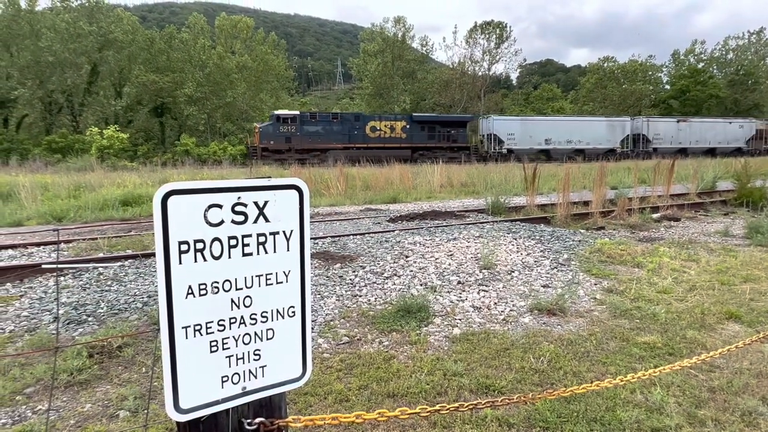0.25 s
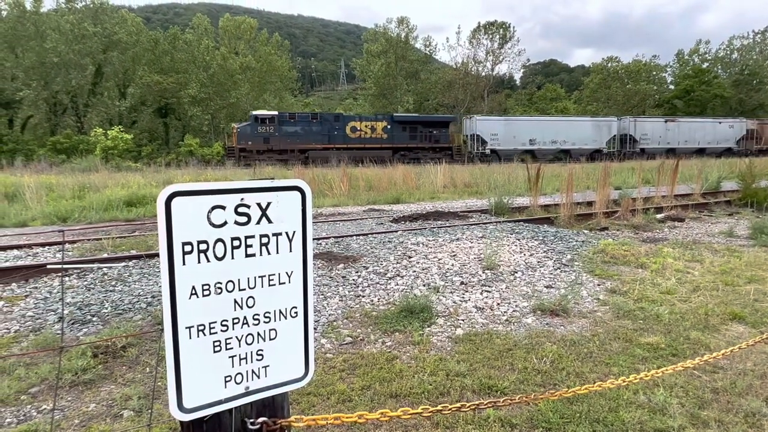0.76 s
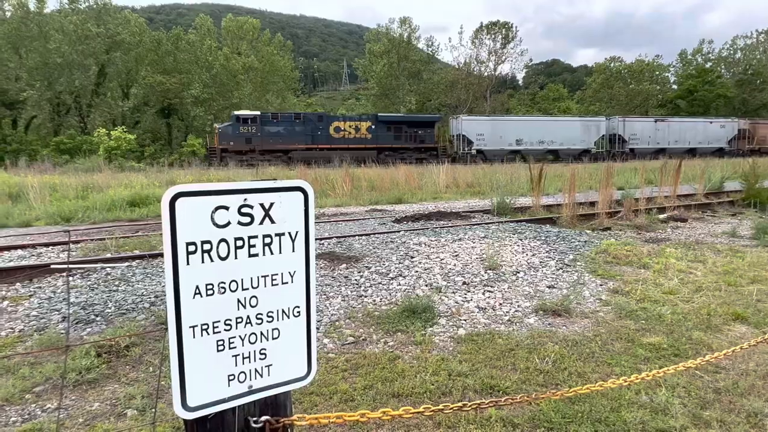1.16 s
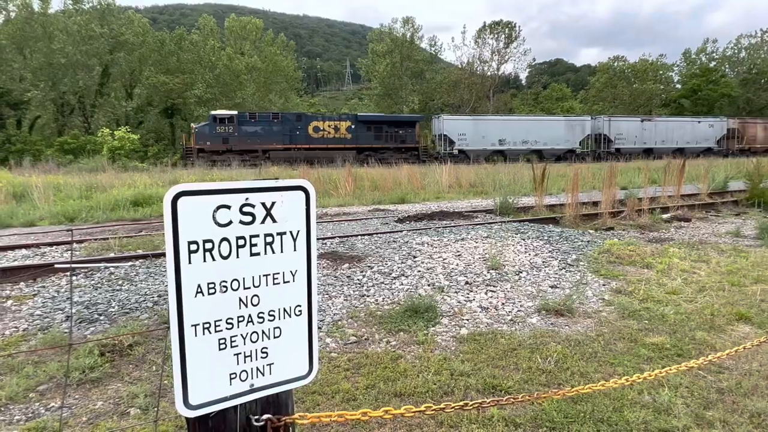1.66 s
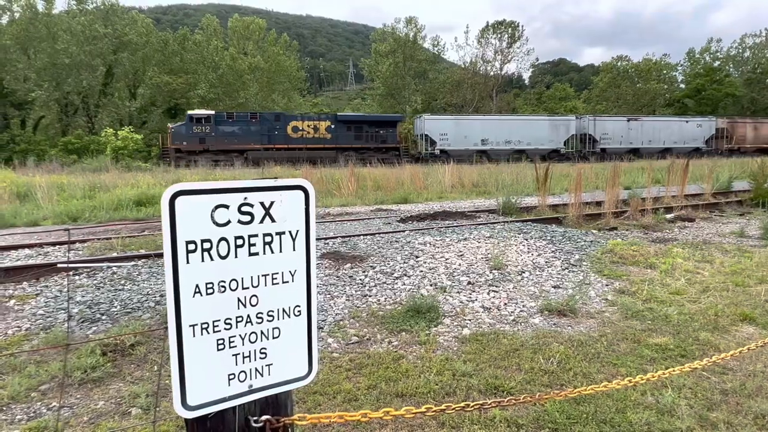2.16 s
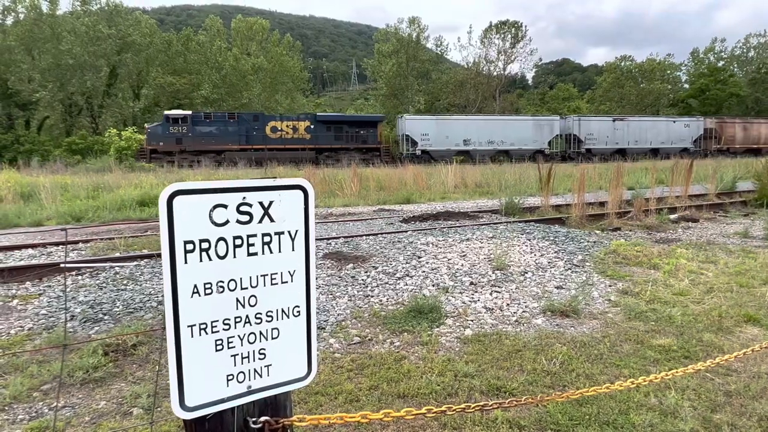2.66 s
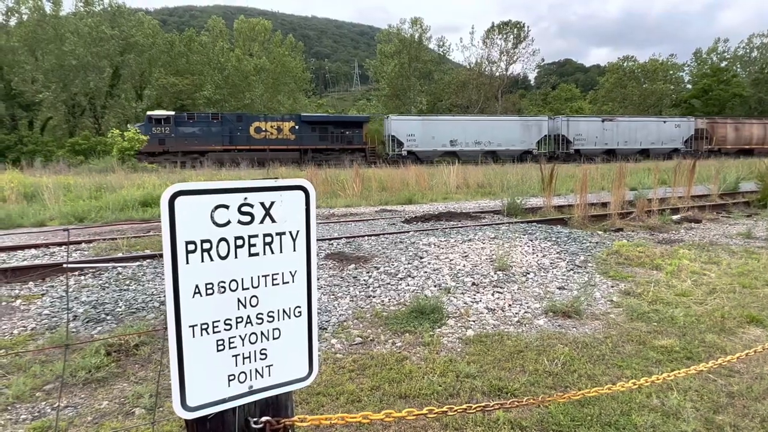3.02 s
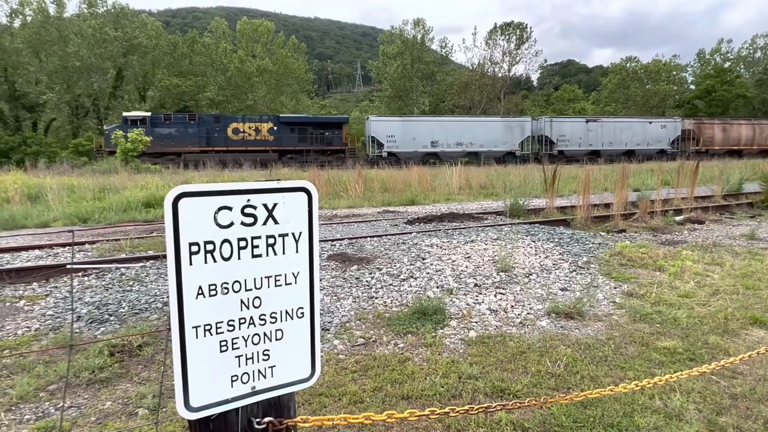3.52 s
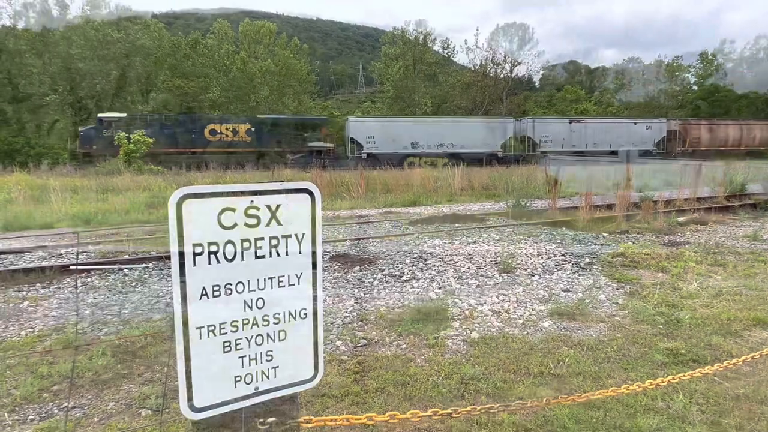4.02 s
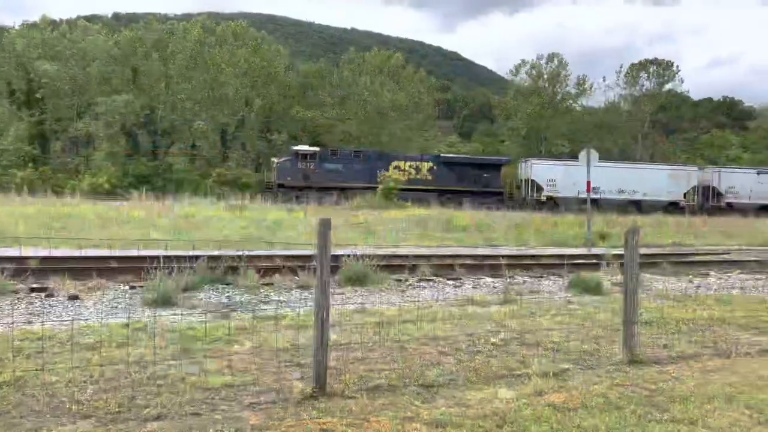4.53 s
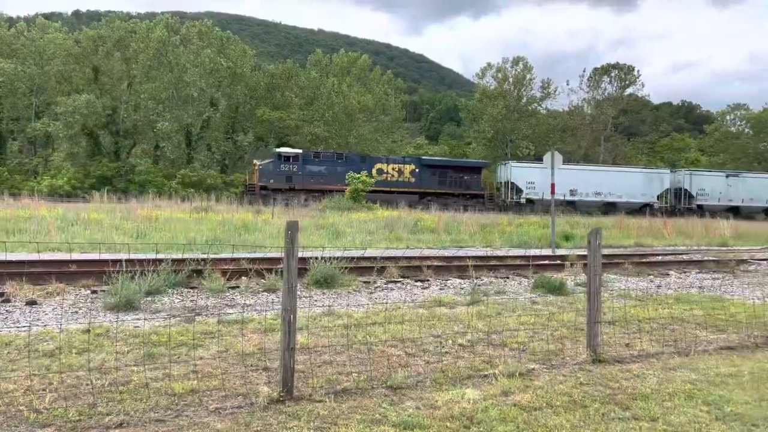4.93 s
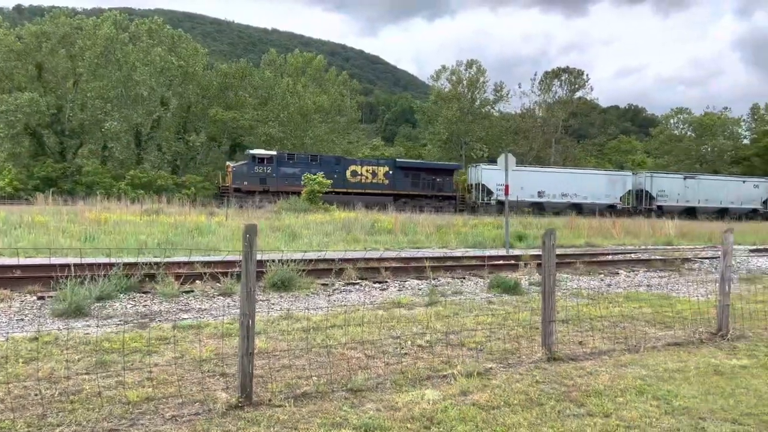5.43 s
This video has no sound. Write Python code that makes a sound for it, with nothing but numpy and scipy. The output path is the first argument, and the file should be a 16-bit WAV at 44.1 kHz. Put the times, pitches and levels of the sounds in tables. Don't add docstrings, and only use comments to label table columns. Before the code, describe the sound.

A freight locomotive's heavy diesel throb and turbo whine ease off across a field, then blend into a slower chug with rolling wagons and flange squeals.

```python
import sys
import numpy as np
from scipy import signal
from scipy.fft import rfft, irfft, next_fast_len
from scipy.io import wavfile
from scipy.ndimage import uniform_filter1d, map_coordinates

SR = 44100
rng = np.random.default_rng(int(sys.argv[2]) if len(sys.argv) > 2 else 0)


def boost_factor(decibels):
    exponent = np.asarray(decibels, float) / 20
    return 10 ** exponent


def dump_mix(stems):
    frames = np.atleast_2d(stems).T
    limited = np.clip(frames, -1, 1)
    pcm = np.round(limited * 32767).astype(np.int16)
    wavfile.write(sys.argv[1], SR, pcm)


N = 250488
GUST_DB_PER_S = 92.5


def unit(x):
    return x / np.sqrt(np.mean(x ** 2) + 1e-20)


def along(points, hz):
    f, v = np.transpose(points)
    return np.interp(np.log(hz + 1), np.log(f + 1), v)


def curves(rows):
    s, *cols = np.transpose(rows)
    return [np.interp(np.arange(N) / SR, s, c) for c in cols]


def wobble(rate):
    knots = rng.standard_normal(int(N * rate / SR) + 4)
    return map_coordinates(knots, [np.arange(N) * rate / SR])


def swells(rows, db_per_s):
    t = np.arange(N) / SR
    events = []
    for start, hold, db in rows:
        outside = np.maximum(np.maximum(start - t, t - start - hold), 0)
        events.append(db - db_per_s * outside)
    return np.max(events, axis=0)


def filtered(x, response):
    m = next_fast_len(N + 8192)
    return irfft(rfft(x, m) * response(np.fft.rfftfreq(m, 1 / SR)), m)[..., :N]


def resonance(f, hz, width):
    return f * width / np.abs(hz * hz - f * f + 1j * f * width)


def tone(turns, db, rough):
    return np.sqrt(2) * boost_factor(db) * np.cos(2 * np.pi * turns + rough)


def rush(spectrum, alike, lean, patchy_db):
    z = signal.stft(rng.standard_normal((2, N)), nperseg=512)[2]
    field = uniform_filter1d(rng.standard_normal(z.shape[1:]), size=5, axis=0)
    field = uniform_filter1d(field, size=16, axis=1)
    pair = signal.istft(z * boost_factor(patchy_db * unit(field)), nperseg=512)[1][:, :N]

    def mid_and_side(hz):
        turn = np.arccos(np.clip(along(alike, hz), -.97, 1)) / 2
        return boost_factor(along(spectrum, hz)) * [np.ones_like(hz), np.tan(turn)]

    mid, side = filtered(pair, mid_and_side)
    left_right = np.array([mid + side, mid - side])
    both = filtered(left_right, lambda hz: boost_factor(np.outer([.5, -.5], along(lean, hz))))
    return both / np.std(both.mean(0))


def placed(x, lean_db, lead_s):
    def response(hz):
        lead = hz * np.exp(-(hz / 6500) ** 4)
        return boost_factor([[lean_db / 2], [-lean_db / 2]]) * np.exp(1j * np.pi * np.outer([lead_s, -lead_s], lead))
    return filtered(x, response)


# pitch_hz, level_db (per Hz)
SELF_NOISE = [(10900, -120), (11050, -9), (11500, -6), (11800, -2), (13200, 0), (14100, -4), (14600, -13),
              (15100, -16)]
# pitch_hz, level_db (per Hz)
PORT_HISS = [(8600, -120), (9000, -3.5), (10300, 0), (11500, -3), (12100, -7), (12300, -120)]
AIR_DB = [-67.5, -73.5]


def microphone_air(share, loss_db):
    air_db = (1 - share) * (AIR_DB[0] + 1.2 * loss_db) + share * AIR_DB[1]
    alike = [(11300, -.2), (11900, .5), (12300, .9)]
    common = boost_factor(air_db) * rush(SELF_NOISE, alike, [(60, 0)], patchy_db=2)
    port = unit(filtered(rng.standard_normal(N), lambda f: boost_factor(along(PORT_HISS, f))))
    return common + boost_factor(air_db + 6) * [[1], [-1]] * port


# peak_s, length_s, pitch_hz, level_db
BURSTS = [(1.85, .03, 13000, -59), (3.268, .006, 5800, -46), (3.87, .015, 8500, -58), (1.65, .02, 9000, -60),
          (1.8, .015, 9100, -60), (1.87, .02, 11400, -66), (.9, .02, 10900, -72), (4.49, .02, 11800, -70),
          (4.95, .06, 9200, -70), (4.4, .06, 9100, -71), (5.4, .015, 9300, -68), (3.131, .003, 700, -34),
          (3.55, .03, 2720, -53), (5.49, .015, 12000, -64), (5.49, .012, 8600, -61), (5.02, .04, 4400, -57)]


def bursts():
    t, out = np.arange(N) / SR, np.zeros(N)
    for start, length, hz, db in BURSTS:
        band = filtered(rng.standard_normal(N), lambda f: np.exp(-((f - hz) / (0.066 * hz)) ** 2))
        out += boost_factor(db) * np.exp(-((t - start) / length) ** 2) * unit(band)
    return out


# start_s, hold_s, level_db
VALVE = [
    (.45, .3, -65.5),
    (.95, .35, -65),
    (1.5, .2, -65),
]


def valve():
    band = filtered(rng.standard_normal(N), lambda f: np.exp(-((f - 8170) / 90) ** 2))
    return boost_factor(swells(VALVE, GUST_DB_PER_S / 2)) * unit(band)


# pitch_hz, width_hz, level_db
INTAKE = [(2955, 64, -54.5), (3424, 110, -53.5)]


def intake(loss_db):
    out = np.zeros(N)
    for hz, width, db in INTAKE:
        band = filtered(rng.standard_normal(N), lambda f: resonance(f, hz, width) ** 2)
        out += boost_factor(db + 0.6 * loss_db + 2.9 * wobble(5.5)) * unit(band)
    return out


# pitch_hz, width_hz, level_db
HOOD = [(612, 14, -1), (653.7, 34, 1), (746, 34, 1.6), (877, 40, -2.5)]


def roar(turns, levels_db, rumble, body, hiss, alike, lean, chug_db, knock_db):
    rumble_db, body_db, hiss_db, hood_db = levels_db
    firing = np.cos(2 * np.pi * 3 * turns) + .9 * np.cos(2 * np.pi * 6 * turns)
    chug = chug_db * np.cos(2 * np.pi * turns)

    low = rush(rumble, alike, lean, patchy_db=0.43)
    deep = filtered(low, lambda f: 1 / (1 + (f / 120) ** 6))
    low = boost_factor(rumble_db) * (low + (boost_factor(chug) - 1) * deep)

    swell_db = .35
    middle = rush(body, alike, lean, patchy_db=0.5)
    middle = middle * boost_factor(body_db + 0.18 * firing + 0.1 * chug + swell_db * wobble(4.82))

    def panels(f):
        return sum(boost_factor(db) * resonance(f, hz, width) for hz, width, db in HOOD) ** 2

    hood = unit(filtered(rush([(20, 0), (20000, 0)], alike, lean, patchy_db=0.0), panels))
    hood = hood * boost_factor(hood_db + 0.53 * firing + 1.1 * wobble(15))
    lower_panels = filtered(hood, lambda f: f < 700)
    hood = hood + (boost_factor(knock_db) - 1) * lower_panels

    high = rush(hiss, alike, lean, patchy_db=1.18)
    high = high * boost_factor(hiss_db + 0.42 * firing + swell_db * wobble(5.4))
    return low + middle + hood + high


# start_s, hold_s, level_db
RING_LOW = [(.6, .4, -43), (1.55, .4, -41), (2.25, .45, -45)]
RING_HIGH = [(.1, .4, -46), (.85, .45, -42), (1.55, .2, -45), (3.1, .5, -52)]


def panel_ring(knock_db):
    t, out = np.arange(N) / SR, np.zeros(N)
    for (hz, _, _), rows in zip(HOOD, (RING_LOW, RING_HIGH)):
        db = swells(rows, 43) + 1.6 * knock_db + 1.5 * wobble(8)
        out += tone(hz * t, db, 1.2 * wobble(16))
    return out


# throttle_state, pitch_hz, width_hz, level_db
STACK = [(0, 331, 44.5, -41), (1, 272, 30, -48), (2, 265, 25, -39.5)]


def stack(state):
    out = np.zeros(N)
    for k, (_, hz, width, db) in enumerate(STACK):
        band = filtered(rng.standard_normal(N), lambda f: resonance(f, hz, width) ** 2)
        nearness = np.clip(1 - np.abs(state - k), 0, 1)
        out += boost_factor(db + 1.34 * wobble(2.6)) * nearness * unit(band)
    return out


# time_s, blade_hz
TURBO = [(0, 3520), (.3, 3460), (.6, 3412), (1.15, 3340), (1.5, 3285), (2.1, 3082), (2.5, 2928),
         (3.3, 2545), (4.1, 2495), (5.68, 2450)]
# start_s, hold_s, level_db
BLADE_HEARD = [(0, 0.17, -47), (.3, 0.32, -46.5), (.73, .03, -48), (.9, .02, -47), (1.0, .1, -51),
               (1.15, 0.19, -46), (1.4, .02, -47), (1.58, .04, -50), (1.75, .02, -49), (2.1, 0.18, -50),
               (2.35, 0.17, -45.5), (3.25, .3, -54), (3.6, .15, -53), (3.79, .13, -45), (4.0, .02, -46),
               (4.06, .07, -47)]
# start_s, hold_s, level_db
OCTAVE_HEARD = [(.6, 0.23, -60), (.95, 0.085, -49), (1.3, 0.35, -52.5), (1.75, 0.24, -54)]


def turbo():
    turns = np.cumsum(curves(TURBO)[0] + 11 * wobble(60)) / SR
    db, octave_db = swells(BLADE_HEARD, 250), swells(OCTAVE_HEARD, GUST_DB_PER_S)
    blade = tone(turns, db + 3.9 * wobble(45), 0.46 * wobble(90))
    octave = tone(2 * turns, octave_db + 4 * wobble(29.7), 0.8 * wobble(200))
    return blade + octave


# tooth_rate_multiple, pulling_db, easing_db, coasting_db, second_viewpoint_db
WHINE = [(1, -48.5, -56.5, -46, -47.5), (2, -42.5, -48, -53.5, -46.5), (3, -53, -49, -51.5, -47),
         (4, -51, -53.5, -48.5, -44.5), (5, -51.5, -54, -48.5, -57.5), (6, -59, -55.5, -69, -58.5)]
# tooth_rate_multiple, start_s, hold_s, gain_db
WHINE_HEARD = [(1, 2.5, 1.7, 5), (2, 2.5, 0.24, 7), (2, 3.22, .58, 12), (3, 0, .7, 9), (3, 1.1, .35, 4),
               (3, 1, .15, 3.5), (3, 3.5, .15, 7), (3, 4.3, .2, 3), (2, 1.3, .4, 4), (2, 1.9, .5, 3),
               (3, 5.5, .45, 5), (4, 0, 0.14, 5), (4, 2, .4, 8.5), (4, 2.5, .3, 8.5), (6, 0, 0.86, 6.5),
               (6, 4.5, .2, 6.5)]


def gears(turns, levels_db, blur):
    teeth_per_cycle = 47.75
    out = 0
    for multiple, db in enumerate(levels_db, 1):
        heard = [(0, 0, 0)] + [row[1:] for row in WHINE_HEARD if row[0] == multiple]
        gain_db = np.maximum(swells(heard, GUST_DB_PER_S), 0)
        teeth = teeth_per_cycle * turns + blur * wobble(14)
        out = out + tone(multiple * teeth, db + gain_db + 1.8 * wobble(9), 0)
    return out


# start_s, hold_s, level_db
SLIPS_LOW = [(4.47, .1, -51), (4.6, .17, -49), (5.37, .05, -50), (5.45, .03, -44), (5.49, .11, -39.5),
             (5.678, .01, -21.5)]
SLIPS_HIGH = [(4.33, .03, -47), (4.385, .035, -47), (4.53, .035, -43), (4.59, .02, -43.5),
              (4.655, .03, -47.5), (4.975, .03, -51), (5.02, .04, -49), (5.3, .015, -52), (5.345, .14, -47),
              (5.55, .02, -47), (5.59, .03, -48)]
WHEEL_HZ = [2479, 2633]
SLIP_JITTER_HZ = [3, 5]
SLIP_DB_PER_S = [285, 700]


def squeal():
    out, sag_hz_per_amp = np.zeros(N), 200
    for slips, hz, jitter, db_per_s in zip((SLIPS_LOW, SLIPS_HIGH), WHEEL_HZ, SLIP_JITTER_HZ, SLIP_DB_PER_S):
        db = swells(slips, db_per_s)
        turns = np.cumsum(hz - sag_hz_per_amp * boost_factor(db) + jitter * wobble(40)) / SR
        flutter_db = 1.7 * np.clip(-2 - db / 15, 0, 1) * wobble(40)
        out += tone(turns, db + flutter_db, 0)
        out += tone(2 * turns, db - 28, 0) + tone(3 * turns, db - 37.5, 0)
    return out


# order, pulling_db, easing_db, coasting_db, second_viewpoint_db
EXHAUST = [(5, -43, -47, -46, -57), (6, -24.5, -31, -34, -42), (7, -34, -35, -28, -47),
           (8, -43, -39, -46, -33), (9, -19.5, -26, -21, -25), (10, -24, -35, -28, -44),
           (11, -23.5, -34, -28, -24), (12, -23, -40, -34, -22), (13, -22, -32, -32, -35),
           (14, -25, -35, -46, -42), (15, -17.5, -32, -37, -40), (16, -38, -42, -41, -43),
           (17, -39, -47, -41, -46), (18, -30, -41, -37, -41), (19, -35, -45, -45, -43),
           (20, -40, -37, -40, -38), (21, -31, -40, -46, -45), (22, -35, -44, -44, -46),
           (23, -37, -43, -52, -45), (24, -40, -41, -50, -48), (25, -44, -51, -51, -47),
           (26, -37, -56, -49, -45), (27, -41, -48, -52, -50), (28, -45, -55, -50, -43)]
# time_s, exhaust_change_db
MISFIRES = [(1.9, -9), (2.0, 1), (2.14, -3), (2.28, 3), (2.4, -13), (2.5, -1.5), (2.57, -1), (2.64, -9.5),
            (2.72, 4.5), (2.82, -15), (2.91, -3.5), (2.97, -5), (3.05, 2), (3.13, 3.5), (3.25, 2.5),
            (3.32, -6), (3.4, 0.5), (3.48, -4), (3.57, 5.5), (3.641, -2), (3.7, 2.5), (3.8, -5.5),
            (3.96, 2), (4.09, -0.5), (4.2, -0.5), (4.35, 1), (4.51, 2), (4.66, -1.5), (4.8, -2.5),
            (4.93, -1), (5.0, -3.5), (5.08, 1), (5.23, 0.5), (5.32, 6), (5.41, 0), (5.53, 1.5), (5.6, 0)]


def exhaust(turns, levels_db, bend, unsteady):
    t, out = np.arange(N) / SR, 0
    surge_db = sum(db * np.exp(-((t - s) / 0.031) ** 2) for s, db in MISFIRES)
    for (order, *_), db in zip(EXHAUST, levels_db):
        boom = np.exp(-((order - 10.4) / 3.8) ** 2)
        level_db = db + boom * surge_db + unsteady * 1.3 * wobble(6)
        out = out + tone(turns * order + bend(order - 12), level_db, unsteady * .25 * wobble(7))
    return out


# time_s, cycle_hz
CYCLE_FIRST = [(0, 7.961), (0.3, 7.912), (0.7, 7.862), (1.1, 7.825), (1.5, 7.811), (1.9, 7.795),
               (2.3, 7.793), (2.7, 7.733), (3.1, 7.679), (3.5, 7.603), (3.9, 7.515), (4.4, 7.435)]
# time_s, throttle_state (0 pulling, 1 easing, 2 coasting)
THROTTLE = [
    (0, 0.04),
    (1.66, 0),
    (1.8, 0.95),
    (2.5, 0.88),
    (2.8, 2),
    (5.68, 4),
]
# pitch_hz, level_db (per Hz)
RUMBLE_FIRST = [(25, -27), (45, 3.5), (70, 5), (100, 3.5), (140, 0), (200, -7.5), (250, -7), (320, -9),
                (370, -14), (430, -18), (520, -53), (900, -120)]
BODY_FIRST = [(240, -31), (400, -10.5), (462, -5), (512, -10.5), (611, -4), (740, -4), (808, -5),
              (995, -12), (1110, -10), (1260, -10.5), (1810, -10), (2110, -14.5), (2700, -14), (3510, -63),
              (5940, -120)]
HISS_FIRST = [(1600, -28.5), (2720, -27.5), (2860, 0.5), (3400, -1.5), (3800, -4.5), (5400, -7.5),
              (6500, -7), (7400, -17), (10200, -23), (10450, -45), (10900, -120)]
# pitch_hz, correlation
ALIKE_FIRST = [(60, 0.95), (130, 0.97), (340, 0.94), (860, 0.4), (1400, 0.47), (2400, 0.35), (3450, 0.31),
               (5000, 0.42), (6000, 0.54), (6600, 0.61), (8000, -0.067), (10200, -0.11), (11200, -0.5),
               (12200, 0.81)]
# pitch_hz, level_db
LEAN_FIRST = [(60, -3.5), (120, 0.5), (240, -1.5), (470, 0), (930, 3.5), (1840, 3), (3660, -3.5),
              (7260, 6.5), (14400, -16)]
ROAR_FIRST_DB = [-25.5, -33.5, -40, -46.5]
LOSS_SHARE = [0.18, 0.57, 0.98, .1]
# start_s, hold_s, gain_db
HOOD_FACING = [(.7, .3, 4.4), (1.4, 0.33, 10.2), (1.9, 0.86, 6.7), (3.5, 0.11, 5.1)]
# time_s, lead_cycles
KNOCK_LEAD = [(0, .05), (.8, .15), (1.2, .3), (1.6, .45), (2.2, .1), (5.68, .1)]


def first_viewpoint(loss_db):
    state = curves(THROTTLE)[0]
    turns = np.cumsum(curves(CYCLE_FIRST)[0]) / SR
    knock_db = 4 * np.cos(2 * np.pi * (turns + curves(KNOCK_LEAD)[0]))
    closed = np.clip(state / .6 - .25, 0, 1)

    def by_state(table):
        return [np.interp(state, [0, 1, 2], row[1:4]) for row in table]

    def bend(u):
        order_shift = [0, (.16 - .335 * closed) * np.sign(u) - .08 - .05 * closed, .06][u % 3]
        upper_shift = -.24 * (4 < u < 8) + .47 * (u > 12)
        pipe = .05 - .3 * closed + .008 * u - (.172 - .04 * closed) * u * u
        return pipe + order_shift + .05 * (u < -2) + (1 - closed) * upper_shift

    throb = exhaust(turns + .67, by_state(EXHAUST), bend, unsteady=.3 + .35 * closed)
    whine_db = by_state(WHINE) + 0.46 * loss_db * np.arange(len(WHINE))[:, None]
    machinery = gears(turns, whine_db, blur=0.029) + turbo() + valve()
    machinery = machinery + panel_ring(knock_db) + intake(loss_db)

    rumble_db, body_db, hiss_db, hood_db = (db + part * loss_db for db, part in zip(ROAR_FIRST_DB, LOSS_SHARE))
    rumble_db = rumble_db - np.clip(state, 0, 1)
    hood_db = hood_db + swells(HOOD_FACING, 11.5)
    noise = roar(turns + 0.475, [rumble_db, body_db, hiss_db, hood_db], RUMBLE_FIRST, BODY_FIRST, HISS_FIRST,
                 ALIKE_FIRST, LEAN_FIRST, chug_db=0.5, knock_db=knock_db)
    mix = boost_factor([[-.35], [.35]]) * throb + boost_factor([[.8], [-.8]]) * machinery + noise + stack(state)
    drift = np.clip(np.arange(N) / SR / 4, 0, 1)
    return (1 - drift) * placed(mix, 0, 4e-5) + drift * placed(mix, 0, 0.00012)


# time_s, cycle_hz
CYCLE_SECOND = [(4, 6.75), (4.46, 6.69), (4.79, 6.637), (5.11, 6.591), (5.44, 6.541), (5.68, 6.511)]
# pitch_hz, level_db (per Hz)
RUMBLE_SECOND = [(25, -31), (45, 2.5), (100, -2.5), (140, -1), (250, -6.5), (370, -16), (430, -17.5),
                 (520, -58.5), (900, -120)]
BODY_SECOND = [(240, -55), (400, 1.5), (447, -7.5), (636, -2.5), (694, -2), (1290, -7.5), (1340, -6.5),
               (1910, -12), (2360, -17.5), (2700, -21.5), (3510, -36.5), (5940, -120)]
HISS_SECOND = [(1600, -14.5), (2700, -7), (4400, -6), (5700, -12), (7700, -19), (8900, -24), (9150, -47),
               (9700, -120)]
# pitch_hz, correlation
ALIKE_SECOND = [(60, 0.6), (130, 0.91), (340, 0.49), (860, 0.16), (1400, 0.18), (4000, 0.28), (6500, 0.29),
                (8600, 0.093), (9600, 0), (11000, 0), (12200, 0.77)]
# pitch_hz, level_db
LEAN_SECOND = [(60, -0.5), (180, 0.0), (540, 0.71), (1610, 1), (4810, 1.0), (14400, -0.5)]
ROAR_SECOND_DB = [-33.5, -34.5, -44, -46]


def second_viewpoint():
    turns = np.cumsum(curves(CYCLE_SECOND)[0]) / SR

    def far(table):
        return [row[4] for row in table]

    def bend(u):
        return .06 + (.09 * u * u if u > -3 else -.15 - .31 * u)

    mix = exhaust(turns - .25, far(EXHAUST), bend, unsteady=.55)
    mix = mix + gears(turns, far(WHINE), blur=0.047)
    mix = mix + roar(turns - .34, ROAR_SECOND_DB, RUMBLE_SECOND, BODY_SECOND, HISS_SECOND,
                     ALIKE_SECOND, LEAN_SECOND, chug_db=8, knock_db=0)
    return placed(mix, -.3, 3e-5)


# time_s, second_viewpoint_share
FADE = [
    (0, 0),
    (3.98, 0),
    (4.45, 1),
    (5.68, 1),
]
# time_s, level_db
RECEDE = [(0, -0.5), (.5, 0.5), (1.6, -1), (3.3, -4), (4.4, -3.5), (5.68, -8)]


def scene():
    share, loss_db = np.clip(curves(FADE)[0], 0, 1), curves(RECEDE)[0]
    air = microphone_air(share, loss_db)
    first = (1 - share) ** 1.2 * first_viewpoint(loss_db)
    second = share ** 0.8 * second_viewpoint()
    return first + second + squeal() + bursts() + air


def top_cut(x):
    return signal.sosfilt(signal.butter(12, 15110, fs=SR, output="sos"), x)


def record(dry):
    return top_cut(dry)


dry = scene()
out = record(dry)
dump_mix(out)
```